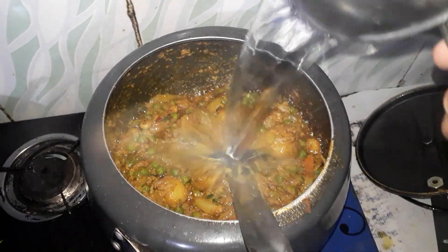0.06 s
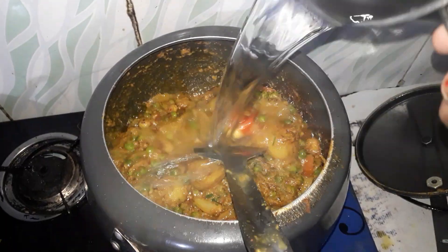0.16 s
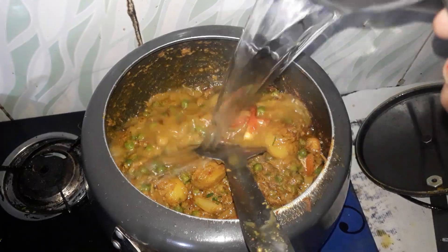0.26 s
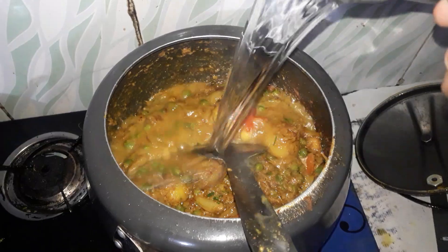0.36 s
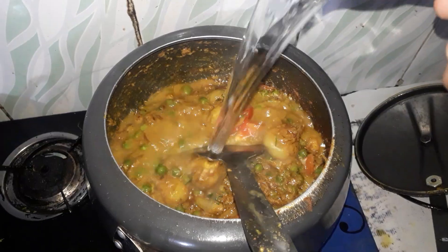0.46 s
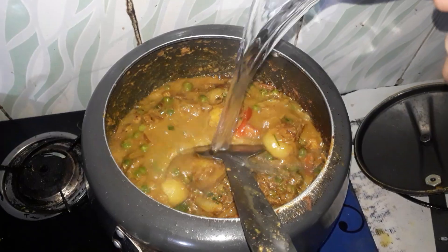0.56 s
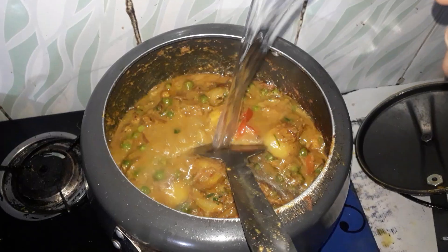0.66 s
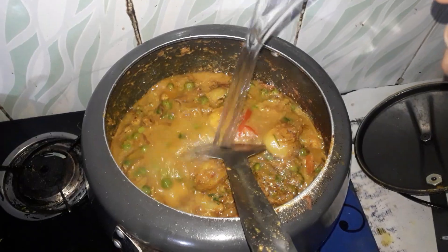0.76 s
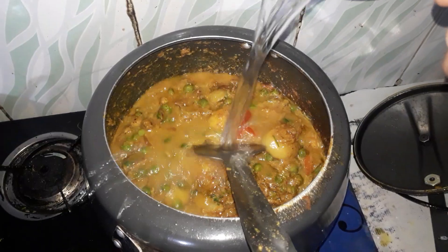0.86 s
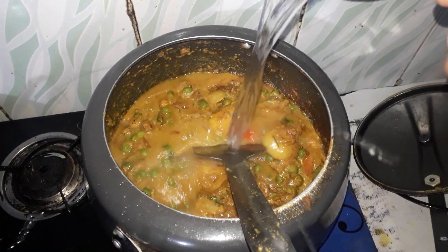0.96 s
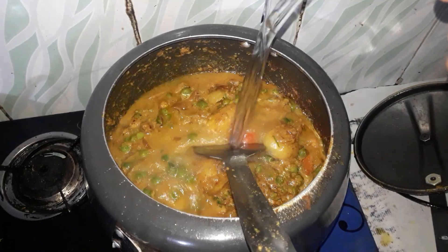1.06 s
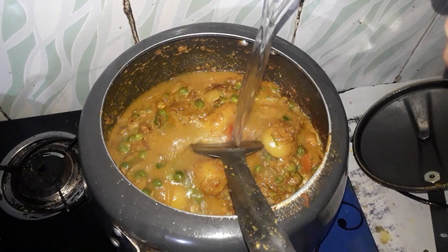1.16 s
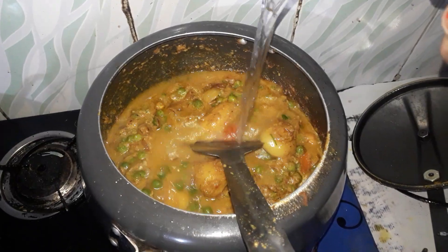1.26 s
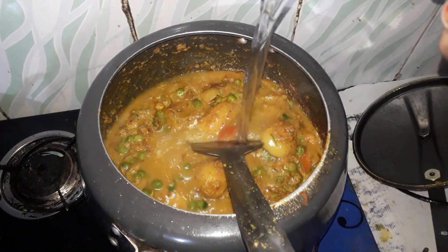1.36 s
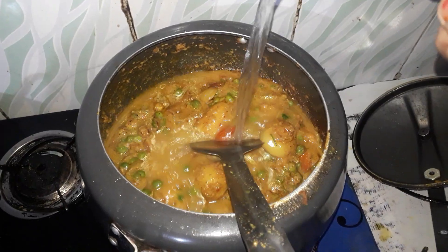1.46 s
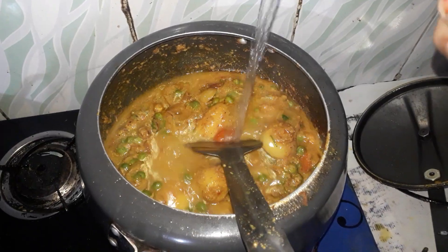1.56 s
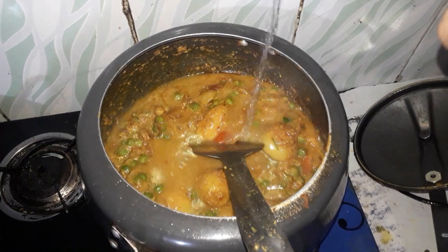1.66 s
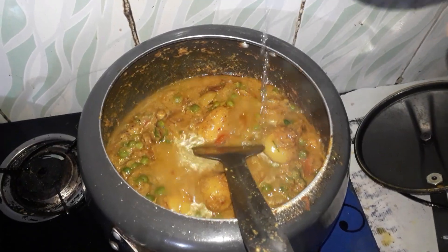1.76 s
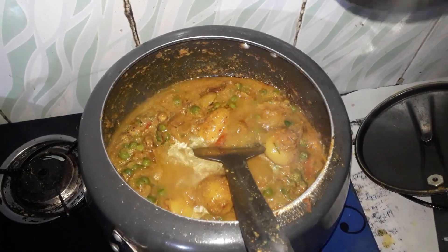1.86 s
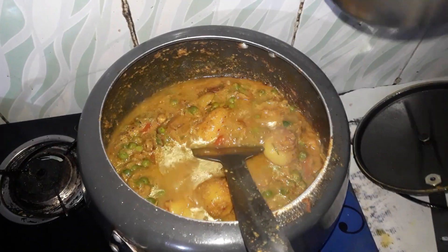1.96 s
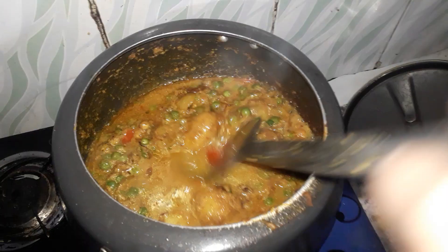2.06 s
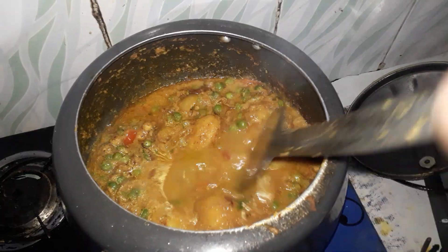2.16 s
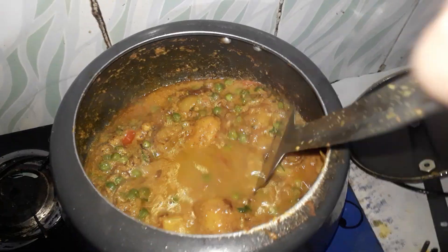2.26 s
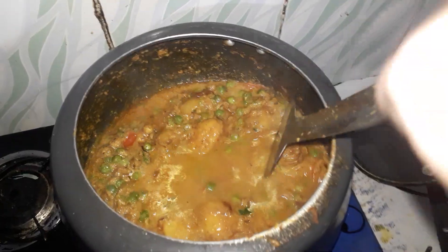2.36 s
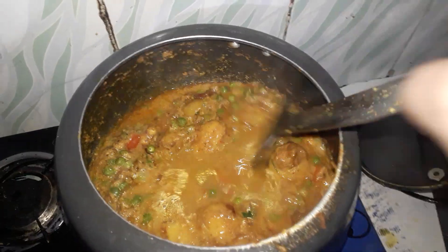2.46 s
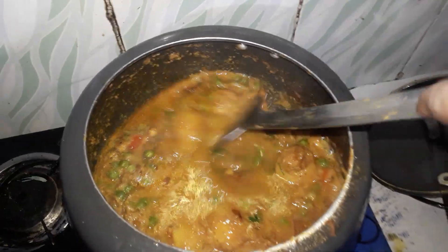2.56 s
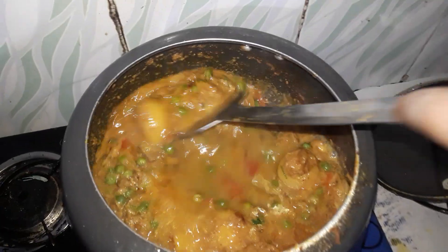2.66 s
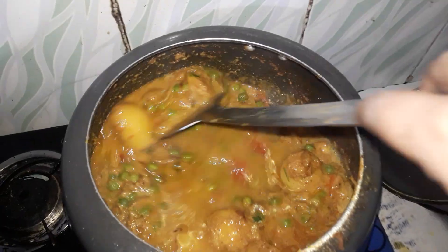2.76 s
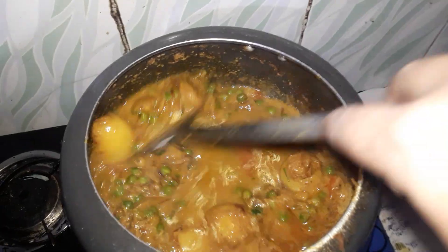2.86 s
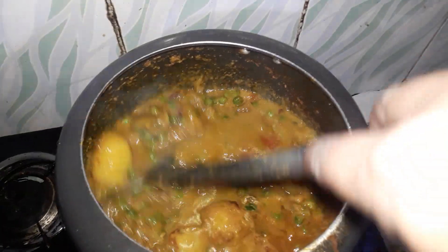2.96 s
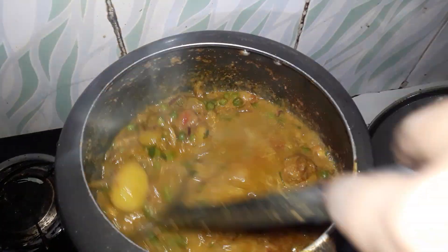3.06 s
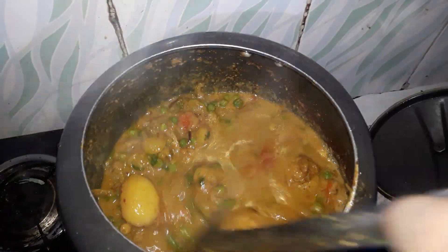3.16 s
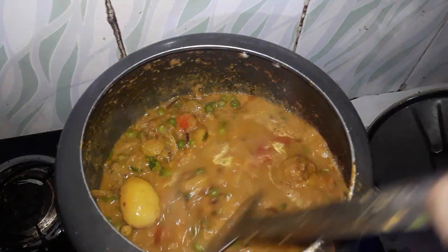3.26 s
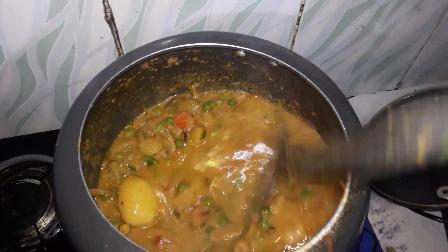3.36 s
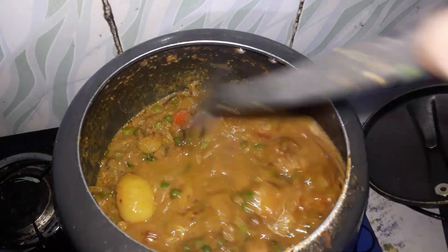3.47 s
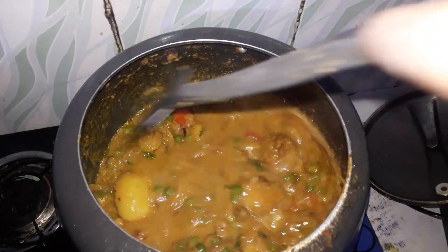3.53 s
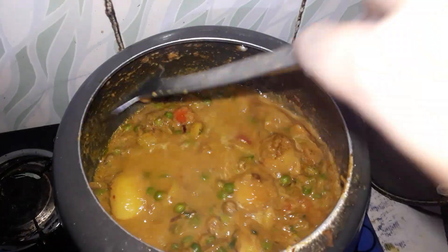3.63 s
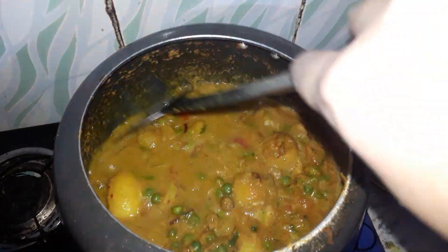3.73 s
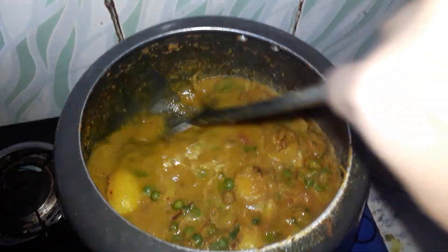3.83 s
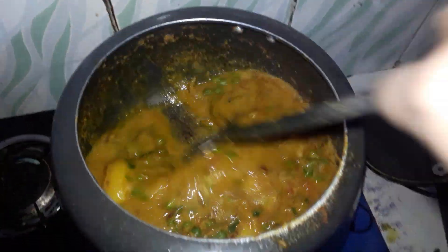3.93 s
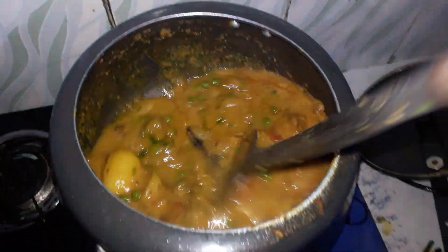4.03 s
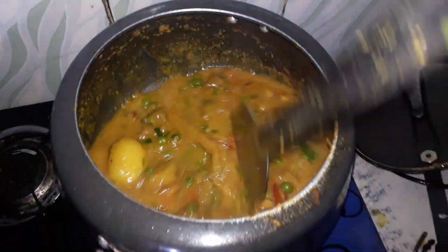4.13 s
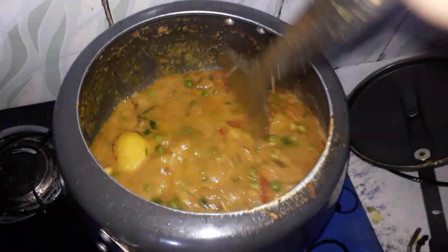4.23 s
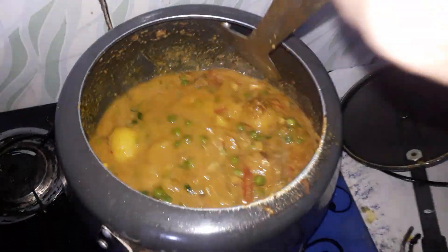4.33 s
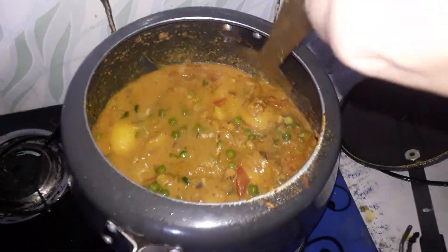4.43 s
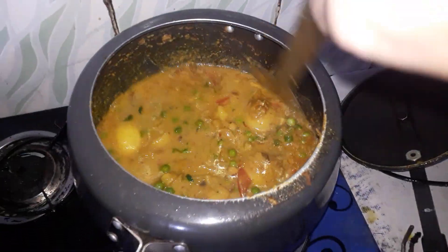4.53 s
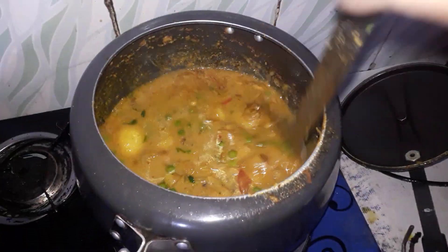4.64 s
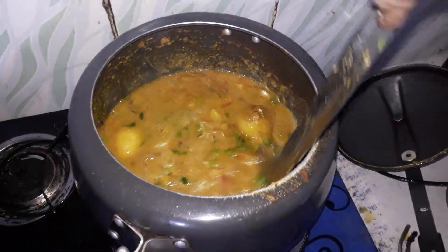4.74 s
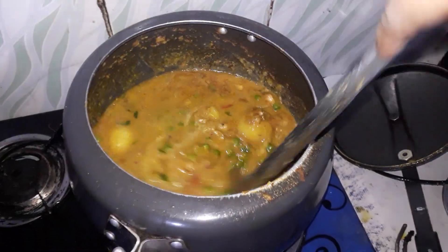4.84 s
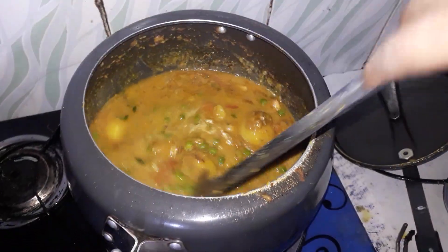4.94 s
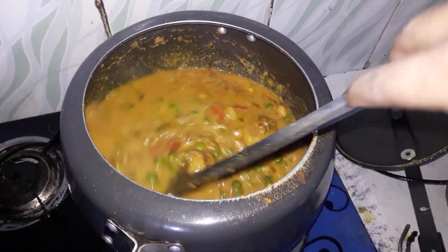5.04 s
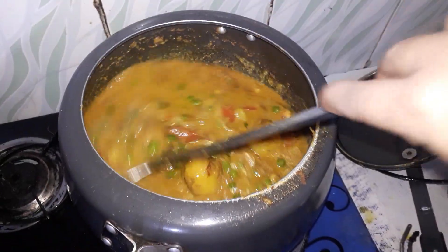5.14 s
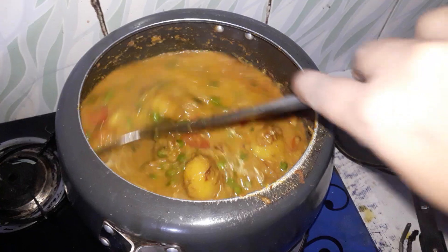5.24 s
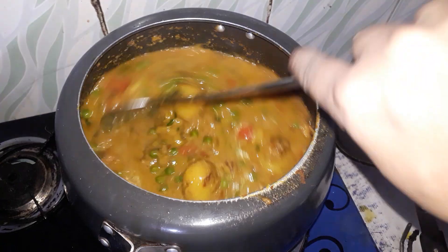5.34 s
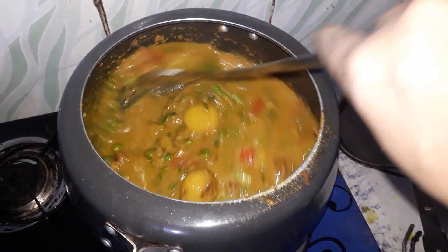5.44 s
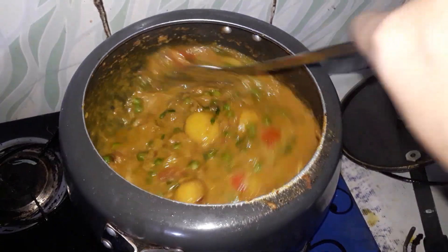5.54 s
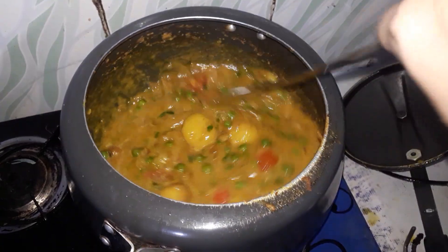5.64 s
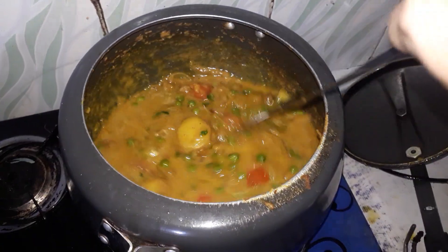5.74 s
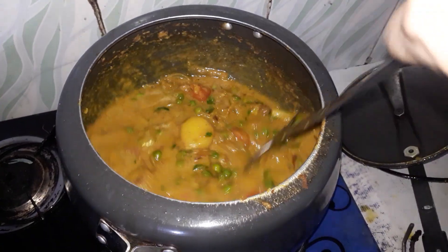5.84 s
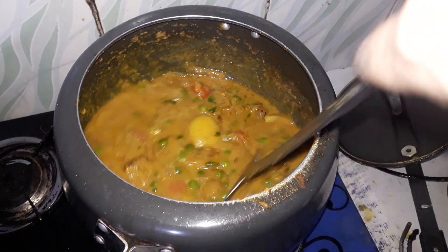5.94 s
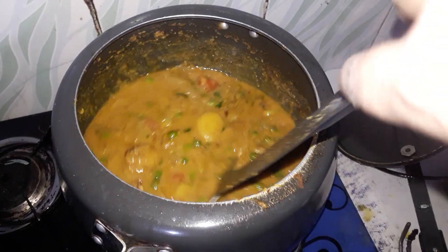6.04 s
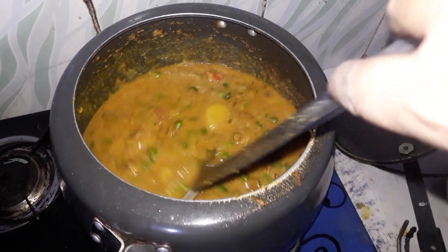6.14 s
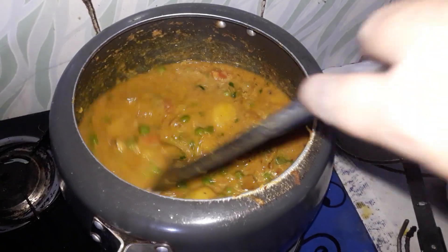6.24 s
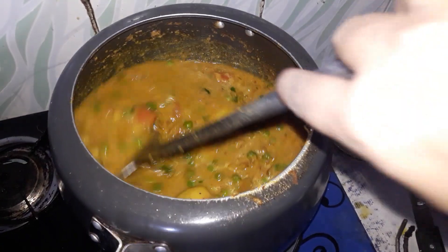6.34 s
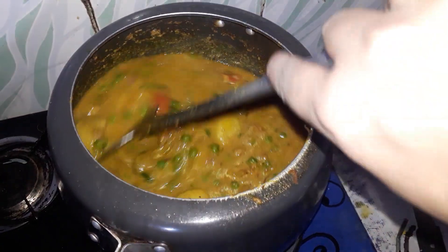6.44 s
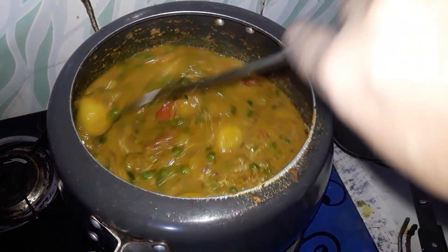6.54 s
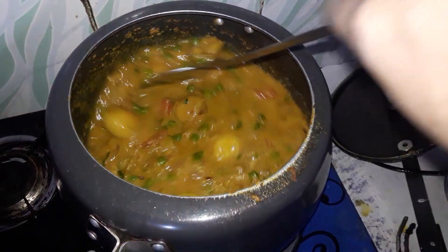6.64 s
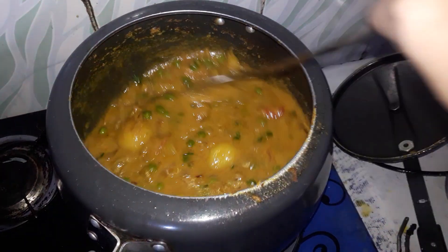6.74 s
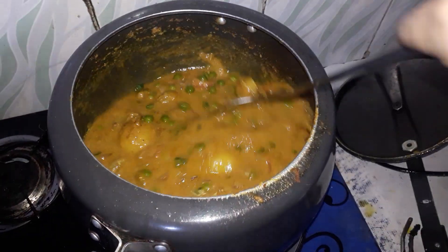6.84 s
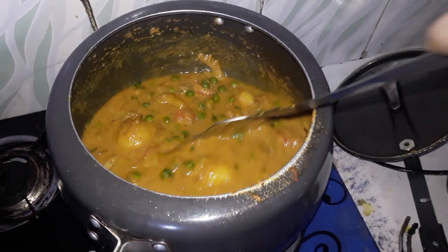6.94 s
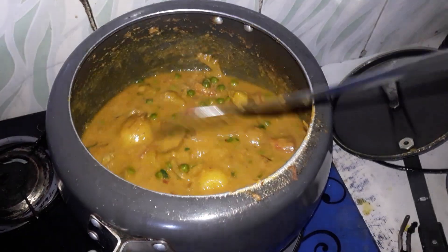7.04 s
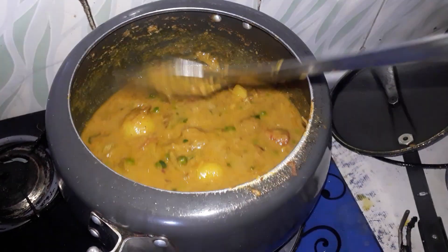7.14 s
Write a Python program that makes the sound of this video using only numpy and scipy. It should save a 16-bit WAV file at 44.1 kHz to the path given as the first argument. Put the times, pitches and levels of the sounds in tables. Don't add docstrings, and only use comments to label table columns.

```python
import sys
import numpy as np
from scipy import signal
from scipy.fft import rfft, irfft, next_fast_len
from scipy.io import wavfile
from scipy.ndimage import uniform_filter1d, map_coordinates

SR = 44100
rng = np.random.default_rng(int(sys.argv[2]) if len(sys.argv) > 2 else 0)


def int16_out(signal):
    q = np.round(np.clip(np.atleast_2d(signal).T, -1, 1) * 32767)
    wavfile.write(sys.argv[1], SR, q.astype(np.int16))


def gain_from_decibels(decibels):
    exponent = np.asarray(decibels, float) / 20
    return 10 ** exponent


N = 317400
HARD_BOIL_DB = -20

# frequency [Hz], level [dB], t60 [s].
STEEL = [(2350, -19, 0.42), (2524, -12.5, 0.5), (3234, 6, 0.066), (3230, -35, 0.63), (3660, -9, 0.32),
         (3820, -43, 0.48), (4130, 0, 0.098), (4130, -26, 0.22), (4400, -26, 0.069), (4620, -6.5, 0.2),
         (4680, 4.5, 0.2), (5235, 2, 0.18), (5200, -28, 0.079), (5530, -11, 0.25), (5700, -17, 0.45),
         (6410, -8, 0.16), (6980, -16, 0.2), (7850, -10.5, 0.093), (8340, -32, 0.16), (8600, -12, 0.44),
         (10000, -46, 0.15), (11400, -33, 0.23), (11700, -45, 0.2), (12020, -17, 0.24)]
# frequency [Hz], level [dB], t60 [s].
BELLY = [(431, -0.5, 0.077), (643, -2, .12), (824, -5, 0.18), (1068, -1.5, 0.11), (1300, -7, 0.041),
         (1640, -6, 0.059), (2230, -6.5, 0.12)]


def unit(x):
    return x / np.sqrt(np.mean(x ** 2) + 1e-20)


def along(points, hz):
    f, v = np.transpose(points)
    return np.interp(np.log(hz + 1), np.log(f + 1), v)


def curves(rows):
    s, *cols = np.transpose(rows)
    return [np.interp(np.arange(N) / SR, s, c) for c in cols]


def wobble(rate):
    knots = rng.standard_normal(int(N * rate / SR) + 4)
    return map_coordinates(knots, [np.arange(N) * rate / SR])


def filtered(x, response):
    m = next_fast_len(N + SR // 2)
    return irfft(rfft(x, m) * response(np.fft.rfftfreq(m, 1 / SR)), m)[:N]


def shaped(points):
    return lambda hz: gain_from_decibels(along(points, hz))


def resonant(modes):
    def response(f):
        total = 0
        for k, (centre, width, db) in enumerate(modes):
            damping = 1j * f * width
            total = total + (-1) ** k * gain_from_decibels(db) * damping / (centre * centre - f * f + damping)
        return total
    return response


def patchy(depth_db):
    z = signal.stft(rng.standard_normal(N), nperseg=512)[2]
    field = uniform_filter1d(rng.standard_normal(z.shape), size=6, axis=0)
    field = uniform_filter1d(field, size=8, axis=1)
    return unit(signal.istft(z * gain_from_decibels(depth_db * unit(field)), nperseg=512)[1][:N])


def ring(modes, t, rough):
    hz, db, t60 = np.transpose(modes)[..., None]
    chance = rng.standard_normal((2, len(modes), 1))
    knots = rng.standard_normal((len(modes), 64))
    flutter = 1 + rough * np.array([np.interp(t * 250, np.arange(64), k) for k in knots])
    scatter_db = 2 * chance[0]
    decay = gain_from_decibels(db + scatter_db - 60 * t / t60)
    return np.sum(flutter * decay * np.sin(2 * np.pi * hz * t + chance[1]), axis=0)


def add(track, s, sound):
    part = track[round(s * SR):][:len(sound)]
    part += sound[:len(part)]


def boil_levels():
    # time [s], fizz level [dB].
    boil = [(0.0, -29), (.158, -24.5), (.478, -19.5), (.816, -22), (1.116, -19.5), (1.75, -20),
            (1.922, -21), (1.957, -18.5), (1.96, -28), (2.31, -32.5), (2.7, -30), (3.26, -35),
            (3.99, -38.5), (4.66, -42), (4.76, -46.5), (5.4, -48), (6.51, -41.5), (6.85, -45)]
    # time [s], gain [dB].
    ducking = [(1.42, -0.5), (1.8, -2.5), (2.3, 0.5), (2.8, -1.5), (4.0, -0.5), (4.53, -8), (4.7, -10.5),
               (5.3, -17.5), (5.49, -11.5), (5.8, -2), (7.2, -1.5)]
    return curves(boil)[0] - HARD_BOIL_DB, curves(ducking)[0]


def bubbles(count, cycles, spread_db):
    when, pitch, size = rng.random((3, count, 1))
    hz, k = 1500 + 14000 * pitch, np.arange(56)
    gain = gain_from_decibels(-spread_db * np.log(size + 0.0077)) * np.sqrt(hz)
    blips = gain * np.sin(2 * np.pi * hz * k / SR) * np.exp(-k * hz / SR / cycles)
    place = (when * N).astype(int) + k
    return unit(np.bincount(place.ravel(), blips.ravel())[:N])


def fizz():
    # frequency [Hz], level per Hz [dB].
    hot_colour = [(1060, -60), (1800, -18.5), (2610, -6), (2810, 0), (3040, -3.5), (3310, -1), (4380, -0.5),
                  (5240, -1.5), (5840, -1), (7610, -1.5), (9440, -21), (10000, -35.5), (13000, -36),
                  (22000, -120)]
    cool_colour = [(1060, -9.5), (1800, -14), (2180, -13.5), (2380, -5), (3020, -0.5), (3270, 0),
                   (4050, -5.5), (5090, -3), (6100, -6.5), (6600, -4.5), (8180, -9), (10000, -31.5),
                   (13000, -46), (22000, -120)]
    spray_colour = [(5290, -11.5), (9000, -19), (9770, -6.5), (13400, -1), (15100, -4.5), (16000, -9)]
    boil_db, _ = boil_levels()
    bursts = patchy(depth_db=1.52) + 0.55 * bubbles(count=24000, cycles=2.8, spread_db=3.0)
    bursts *= gain_from_decibels(0.52 * wobble(6.02) + 0.53 * wobble(30.03))
    cooled, = curves([(1.9, 0), (5, 0.95)])
    hot = unit(filtered(bursts, shaped(hot_colour)))
    cool = unit(filtered(bursts[::-1], shaped(cool_colour)))
    body = np.sqrt(1 - cooled) * hot + np.sqrt(cooled) * cool
    spray = unit(filtered(bursts, shaped(spray_colour)))
    return gain_from_decibels(HARD_BOIL_DB + boil_db) * body + gain_from_decibels(-38.5 + 1.074 * boil_db) * spray


def pot_air():
    # frequency [Hz], width [Hz], level [dB].
    cavity = [(610, 65, -6.5), (1095, 56, 3), (1460, 330, -7.5), (1653, 76, 0.5), (2040, 200, -3)]
    fizz_drops_s, swell_db_per_s = 1.96, 3
    boil_db, duck_db = boil_levels()
    t = np.arange(N) / SR
    swell_db = swell_db_per_s * t * (t < fizz_drops_s)
    air_db = -43 + 0.33 * boil_db + 0.6 * duck_db + swell_db
    return gain_from_decibels(air_db) * unit(filtered(patchy(depth_db=1.0), resonant(cavity)))


def flame():
    # frequency [Hz], level per Hz [dB].
    roar_colour = [(15, -48), (25, -53), (43, -3.5), (70, -10), (108, 4), (139, -1), (205, -1.5), (280, -7),
                   (360, -33), (620, -120)]
    _, duck_db = boil_levels()
    rumble = filtered(patchy(depth_db=1.3), shaped(roar_colour))
    flicker_db = 2 * wobble(5.4)
    return gain_from_decibels(-46.5 + duck_db + flicker_db) * unit(rumble)


def sauce():
    # frequency [Hz], level per Hz [dB].
    slosh_colour = [(140, -38), (230, -14), (280, -12.5), (335, 4), (460, -4.5), (498, 1), (582, -12),
                    (800, -10), (1040, -11.5), (1760, -120)]
    boil_db, duck_db = boil_levels()
    slosh = filtered(patchy(depth_db=1.5) * gain_from_decibels(1.3 * wobble(12)), shaped(slosh_colour))
    return gain_from_decibels(-41.5 + 0.25 * boil_db + 0.55 * duck_db) * unit(slosh)


def pops():
    # start [s], peak level [dB], pitch [Hz].
    drops = [(.1326, -10, 3340), (.2165, -13, 3430), (0.4147, -4, 6000), (0.49, -7, 2900),
             (0.625, -2.5, 4370), (.7657, -9.5, 3660), (1.0957, -3, 5560), (1.5985, -14, 5880),
             (1.734, -8, 3660), (1.7823, -6.5, 3400), (2.0388, -19, 3520), (2.365, -16, 4200),
             (2.859, -21, 3810), (3.497, -19, 4390), (3.5057, -28, 2960), (3.523, -23, 5400),
             (5.406, -32, 4670), (5.8282, -31, 5080), (6.7945, -22.5, 5290), (.624, -23.5, 486)]
    out, t = np.zeros(N), np.arange(SR // 50) / SR
    for s, db, hz in drops:
        crack = 0.38 * np.diff(rng.standard_normal(len(t) + 1)) * gain_from_decibels(-60 * t / 0.0095)
        swell = t * hz * np.exp(1 - t * hz / 2.0) / 1.56
        blip = swell * np.sin(2 * np.pi * hz * t)
        add(out, s, gain_from_decibels(db - 5.5) * (blip + crack))
    return out


def kitchen(x):
    # frequency [Hz], t60 [s].
    room_t60 = [(200, 0.2), (2000, 0.41), (6000, 0.35), (12000, 0.19)]
    hz, t, z = signal.stft(rng.standard_normal(SR // 2), SR, nperseg=256)
    decay = gain_from_decibels(-60 * t / along(room_t60, hz)[:, None])
    tail = signal.istft(z * decay, SR, nperseg=256)[1]
    return signal.fftconvolve(np.pad(x, (200, 0)), tail / np.linalg.norm(tail))[:N]


def crackle(per_second, spread_db):
    there, size, sign = rng.random((3, N))
    loudness = gain_from_decibels(-spread_db * np.log(size + 0.022))
    return unit((there < per_second / SR) * loudness * np.sign(sign - .5))


def scraping():
    # loudest at [s], rise [s], fall [s], rasp level [dB], belly level [dB].
    strokes = [
        (2.525, 0.14, 0.18, -23.5, -36.5),
        (3.689, .035, 0.088, -28.5, -47),
        (4.6, .03, 0.14, -32, -41.5),
        (4.89, 0.16, 0.14, -40.5, -42.5),
        (5.115, 0.051, 0.18, -38.5, -47),
        (5.62, 0.062, 0.1, -46, -39),
        (6.272, 0.077, 0.17, -37, -35.5),
        (6.645, .03, .08, -41, -40),
        (6.698, 0.068, 0.072, -34.5, -36.5),
    ]
    t, pressure = np.arange(N) / SR, np.zeros((2, N))
    for s, rise, fall, rasp_db, belly_db in strokes:
        fade_db = 26 * np.maximum((s - t) / rise, (t - s) / fall) ** 1.45
        pressure += gain_from_decibels([rasp_db - fade_db, belly_db - 0.51 * fade_db])
    slips = crackle(per_second=2500, spread_db=5.0) * gain_from_decibels(2.5 * wobble(45))
    rasp = filtered(slips, resonant([(hz, 120 + 14 / t60, 0.3 * db) for hz, db, t60 in STEEL]))
    belly = filtered(slips, resonant([(hz, 20 + 8 / t60, db) for hz, db, t60 in BELLY]))
    return gain_from_decibels(-4.5) * pressure[0] * unit(rasp) + gain_from_decibels(-6.0) * pressure[1] * unit(belly)


def clanks():
    # start [s], peak level [dB], thud level [dB], brightest pitch [Hz],
    # focus [dB per octave squared].
    contacts = [(2.9289, -8.5, -8, 3770, 6), (2.936, -14.5, -11, 4770, 12), (3.6265, -4, -26, 3540, 16),
                (3.6345, -0.5, -24, 4480, 10), (3.643, -18, -27, 4800, 15), (3.69, -12, -26, 5500, 1),
                (3.732, -20, -17, 4680, 14), (4.3164, 0.5, -34, 5530, 12), (4.326, 1.5, -36, 4650, 32),
                (4.338, -1.5, -30, 5200, 10), (4.347, -15, -17, 5560, 6), (4.359, -13, -20, 4600, 0),
                (4.377, -13.5, -34, 4800, 1), (4.525, -9, -27, 5600, 4.5), (4.5628, -9.5, -38, 4840, 4),
                (4.624, -25, -22, 4870, 4), (4.695, -28, -7.5, 3500, -2), (4.742, -30, -9, 3500, 4),
                (5.5287, -25.5, -22, 4470, 6), (5.557, -26.5, -9.5, 3000, 2), (6.2305, -11, -16, 5200, 4)]
    held_ring, freed_per_bounce = 0.2, 1.19
    bounce_gap_s = .025
    out, t = np.zeros(N), np.arange(SR // 6) / SR
    rise = 1 - np.exp(-t / 0.00095)
    last_s, free = 0, held_ring
    for s, db, thud_db, bright_hz, focus_db in contacts:
        free = free * freed_per_bounce if s - last_s < bounce_gap_s else held_ring
        last_s = s
        tilt_db = lambda hz: -np.abs(focus_db) * np.log2((hz + 1) / bright_hz) ** 2
        modes = [(hz, .6 * level + tilt_db(hz), t60 * free) for hz, level, t60 in STEEL]
        steel = ring(modes, t, rough=.5)
        colour = gain_from_decibels(np.maximum(tilt_db(np.fft.rfftfreq(len(t), 1 / SR)), -21))
        noise = unit(irfft(rfft(rng.standard_normal(len(t))) * colour, len(t)))
        clatter = noise * (0.26 * gain_from_decibels(-60 * t / (0.18 * free)) + 0.068 * gain_from_decibels(-60 * t / (0.69 * free)))
        thud = ring(BELLY, t, rough=0.64) + 1.2 * np.sin(2 * np.pi * 350 * t) * gain_from_decibels(-60 * t / 0.053)
        bright = 1.07 * steel / np.abs(steel).max() + clatter
        add(out, s, rise * (gain_from_decibels(db - 1.5) * bright + gain_from_decibels(db + thud_db - 8) * thud))
    return out


def dwells():
    # start [s], length
    # [s], pitch [Hz], level [dB].
    held_tones = [(2.945, 0.1, 824, -40), (3.625, 0.02, 2153, -23), (3.634, .014, 8100, -20),
                  (3.635, 0.021, 4780, -25), (3.642, 0.028, 1940, -32), (3.675, 0.069, 824, -36),
                  (3.807, 0.024, 423, -43), (4.314, 0.054, 11900, -21.5), (4.337, 0.082, 824, -30),
                  (4.525, 0.01, 3550, -25), (4.5256, 0.0082, 5730, -30), (4.5265, .012, 7900, -29),
                  (4.563, 0.0089, 4750, -28), (4.565, 0.053, 1640, -42.5), (4.585, 0.14, 442, -41),
                  (4.632, 0.075, 1046, -43.5), (4.7, 0.27, 830, -51), (4.83, .04, 1153, -44),
                  (4.88, .07, 1300, -50), (4.89, 0.091, 1145, -43.5), (5.1, .06, 480, -51),
                  (5.549, 0.042, 365, -40), (5.611, 0.12, 334, -40), (6.231, 0.039, 431, -32.5),
                  (6.359, .04, 3740, -41), (6.624, 0.026, 372, -33), (6.678, 0.038, 2570, -33.5),
                  (6.695, 0.047, 1103, -39), (4.316, 0.055, 5670, -14), (4.32, 0.067, 4580, -17)]
    out, t = np.zeros(N), np.arange(SR // 2) / SR
    for s, length, hz, db in held_tones:
        waver = 1 + 0.5 * unit(uniform_filter1d(rng.standard_normal(len(t)), size=300))
        swell = np.sin(np.pi * np.clip(t / length, 0, 1) ** 0.45)
        add(out, s, gain_from_decibels(db) * waver * swell * np.sin(2 * np.pi * hz * t))
    return out


def tick():
    # frequency [Hz], level [dB], t60 [s].
    edge_modes = [(9685, -26.5, 0.052), (14650, -24, .03), (15500, -21, 0.057)]
    out, t = np.zeros(N), np.arange(SR // 5) / SR
    add(out, 4.3985, (1 - np.exp(-t / 0.00046)) * ring(edge_modes, t, rough=.4))
    return out


def scene():
    # frequency [Hz], gain [dB].
    microphone = [(300, -3.6), (2000, -0.9), (8000, 1.5), (9500, -9.5), (13000, -11), (15600, -15)]
    near = filtered(pops() + scraping() + clanks() + dwells(), shaped(microphone))
    pot = fizz() + pot_air() + flame() + sauce()
    return (pot + near + gain_from_decibels(-12) * kitchen(near) + tick())[None]


def roll_off(x):
    return signal.sosfilt(signal.butter(12, 16270, fs=SR, output="sos"), x)


def record(dry):
    top_hz, bass_hz = 15850, 33
    held = dry[0] / (1 + np.abs(dry[0] / .98) ** 6) ** (1 / 6)
    heard = filtered(held, lambda hz: (hz < top_hz) / (1 + (bass_hz / (hz + 1)) ** 6))
    return roll_off(heard[None])


dry = scene()
out = record(dry)
int16_out(out)
```